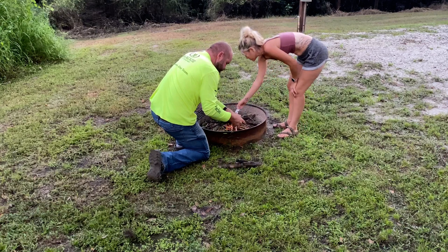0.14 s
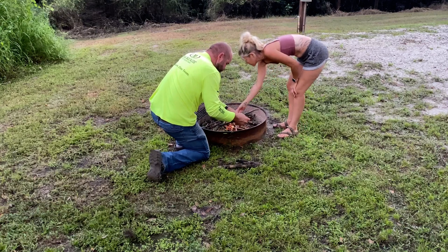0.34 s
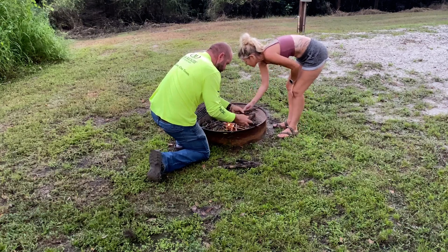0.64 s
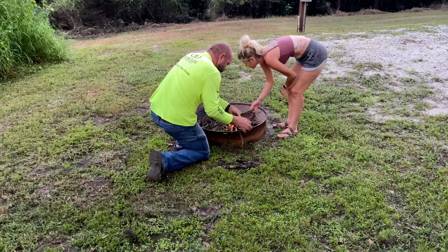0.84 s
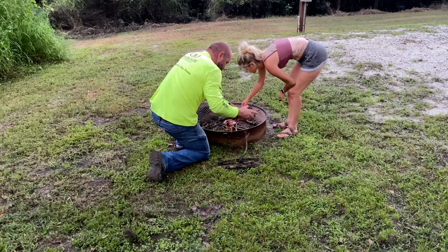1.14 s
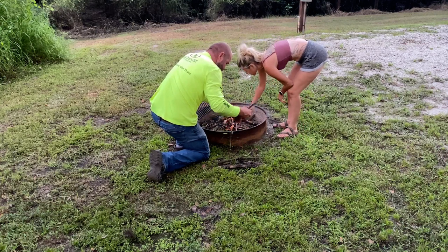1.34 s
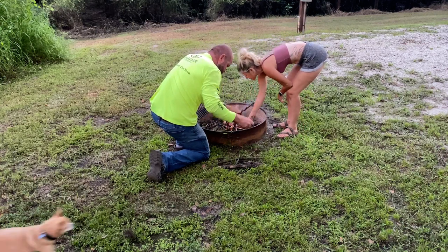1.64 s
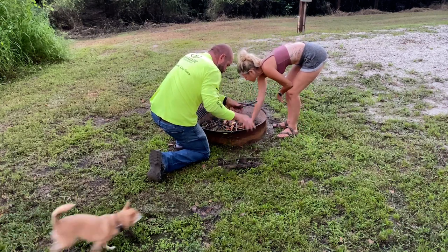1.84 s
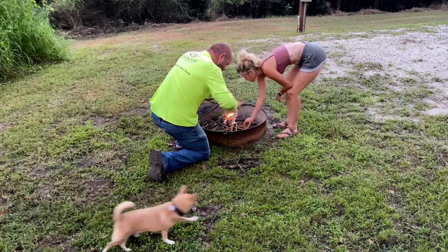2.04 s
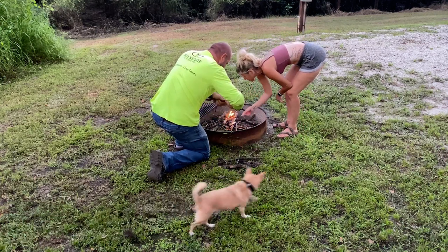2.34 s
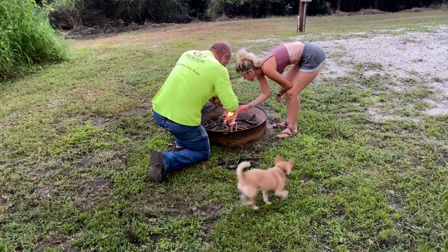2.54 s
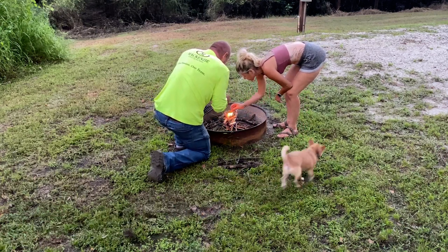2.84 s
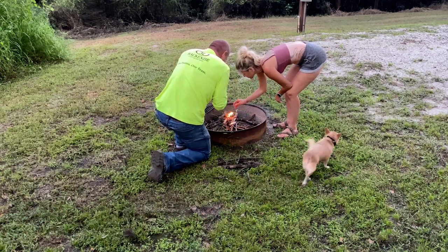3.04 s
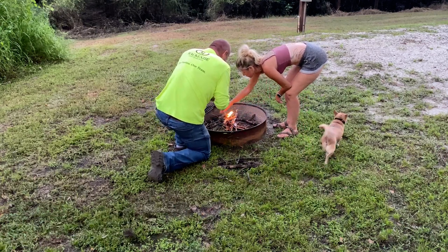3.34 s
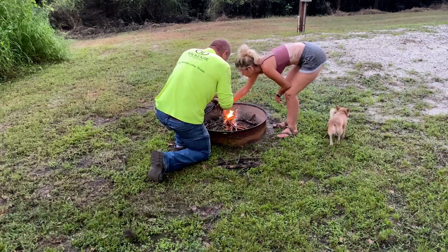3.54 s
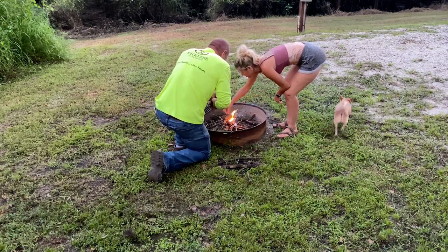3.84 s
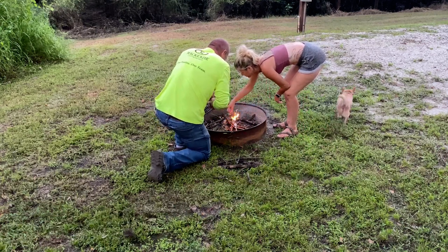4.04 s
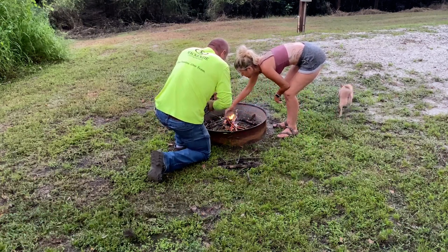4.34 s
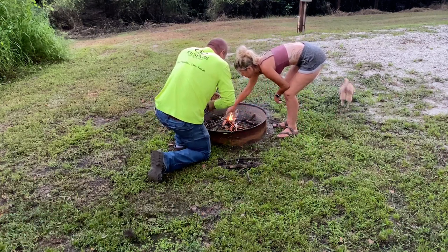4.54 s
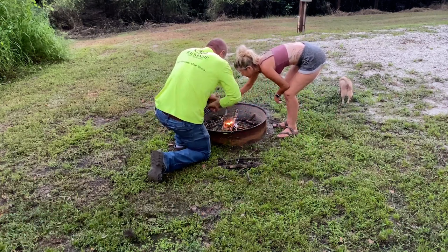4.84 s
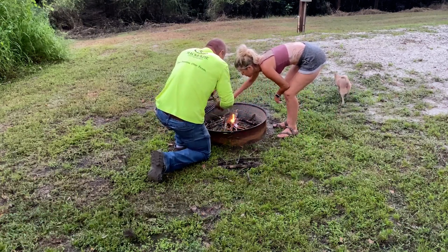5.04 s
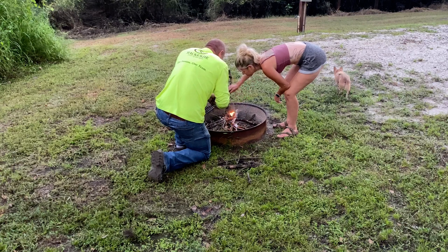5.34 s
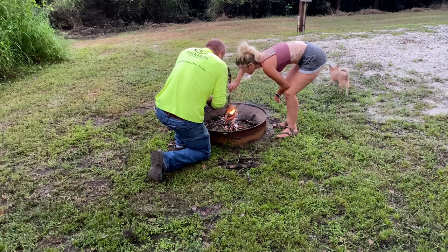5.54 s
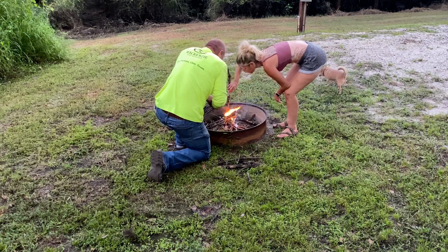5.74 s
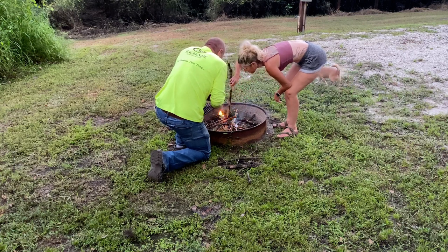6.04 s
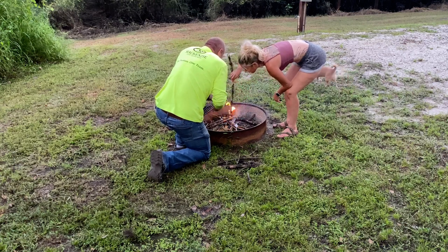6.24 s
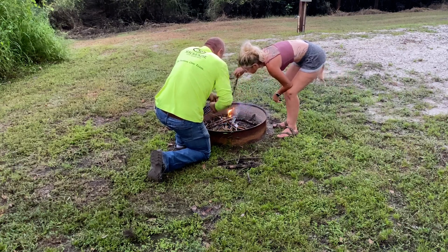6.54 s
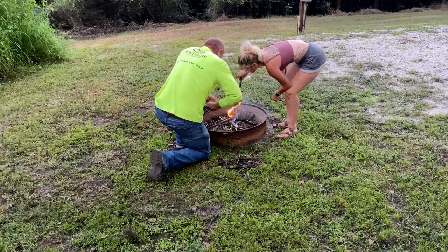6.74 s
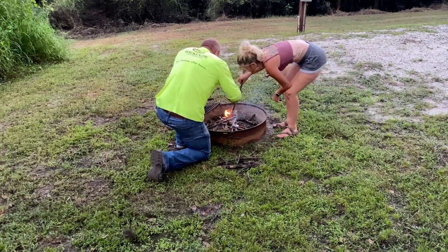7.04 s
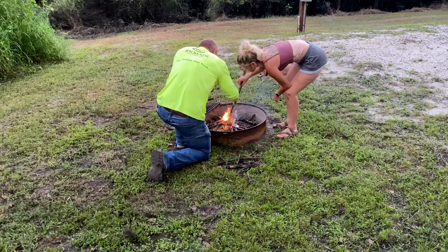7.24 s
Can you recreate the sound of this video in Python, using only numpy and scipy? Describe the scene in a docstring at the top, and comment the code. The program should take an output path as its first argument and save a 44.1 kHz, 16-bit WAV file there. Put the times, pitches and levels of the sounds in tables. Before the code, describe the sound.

A shrill, dense insect chorus buzzes over a low distant rumble while sticks knock, tick and crack sharply in a small fire nearby.

```python
"""Evening at a campsite: a dense insect chorus sings from the trees all round, over a low far-off rumble.
A few metres from the stereo microphone a small fire is fed in a steel ring: sticks crack, knock and tick.
The chorus is coloured noise with rasping voices, trills and two clicking cicadas; the rumble is low noise.
Wood sounds are snaps and dying runs of clicks that ring resonances. Each comes back off the ground and
the ring and dies away among the trees."""
import sys
import numpy as np
from scipy import signal
from scipy.fft import rfft, irfft, next_fast_len
from scipy.io import wavfile

SR = 44100
rng = np.random.default_rng(int(sys.argv[2]) if len(sys.argv) > 2 else 0)


def wrap_up_sound(samples):
    """Save the sound to the file named by the first command line argument, as 16-bit audio."""
    columns = np.atleast_2d(samples).T
    # keep every value between -1 and 1, then stretch to whole-number steps
    tamed = np.clip(columns, -1, 1)
    steps = np.round(tamed * 32767).astype(np.int16)
    wavfile.write(sys.argv[1], SR, steps)


N = 325281
TIME = np.arange(N) / SR
BINS_HZ = np.maximum(np.fft.rfftfreq(next_fast_len(N), 1 / SR), 1)


def from_db(db):
    """Decibels to gain."""
    return 10 ** (np.asarray(db) / 20)


def rms_one(x):
    """Scale to unit power."""
    return x / np.sqrt(np.mean(x ** 2) + 1e-20)


def in_time(rows):
    """Curve rows to one value a sample for each column after the time."""
    s, *columns = np.transpose(rows)
    return [np.interp(TIME, s, column) for column in columns]


def drift(rate):
    """Slow chance: noise smoothed to about the given rate in Hz, of spread 1."""
    step = 40  # samples between slow values
    r = np.exp(-2 * np.pi * rate * step / SR)
    noise = rng.standard_normal(N // step + 2002)
    slow = signal.lfilter([1], [1, -2 * r, r * r], noise)[2000:]  # skip the filter's start
    return np.interp(np.arange(N) / step, np.arange(len(slow)), rms_one(slow))


def resonance(x, hz, width_hz):
    """Two-pole band-pass with gain 1 on top: a body that rings at one pitch."""
    r = np.exp(-np.pi * width_hz / SR)
    feed = np.array([1, 0, -1]) * (1 - r * r) / 2
    return signal.lfilter(feed, [1, -2 * r * np.cos(2 * np.pi * hz / SR), r * r], x + 1e-18)


def pair(mid, side, alike):
    """Two unrelated signals make a left and a right of the given likeness."""
    alike = np.clip(alike, -1, 1)
    common = np.sqrt(1 + alike) * mid
    apart = np.sqrt(1 - alike) * side
    return np.array([common + apart, common - apart]) / np.sqrt(2)


def far_noise(spectrum, alike, lag_ms=0, pan_db=0):
    """Stereo noise of a given colour that reaches the left side late; rms 1."""
    hz, level_db = np.transpose(spectrum)
    size = next_fast_len(N)
    bins = pair(*rfft(rng.standard_normal((2, size))), alike)
    colour_db = np.interp(np.log(BINS_HZ), np.log(hz), level_db)
    # past the last point the colour falls 40 dB per octave
    colour_db = colour_db - 40 * np.maximum(np.log2(BINS_HZ / hz[-1]), 0)
    bins = bins * from_db(colour_db)
    bins[0] *= from_db(pan_db) * np.exp(-2j * np.pi * BINS_HZ * lag_ms / 1000)
    return rms_one(irfft(bins, size)[:, :N])


def burst(t60, alike):
    """Fibres give way in a quick run of snaps that dies by 60 dB in t60 seconds."""
    t = TIME[:SR // 8]
    snaps = pair(*rng.choice([-1., 1.], (2, len(t))), alike)
    return snaps * from_db(-60 * t / t60)


def add(out, s, sound):
    """Mix a short sound in at time s."""
    start = max(round(s * SR), 0)
    out[:, start:start + sound.shape[1]] += sound[:, :N - start]


def coloured(x, points_hz, points_db):
    """Pass a short sound through a body with the given colour; minimum phase, so nothing sounds early."""
    size = 8192
    hz = np.maximum(np.fft.rfftfreq(size, 1 / SR), 1)
    colour_db = np.interp(np.log(hz), np.log(points_hz), points_db)
    cepstrum = irfft(np.log(from_db(colour_db)))
    # folding the cepstrum forward in time gives the minimum phase
    cepstrum[1:size // 2] *= 2
    cepstrum[size // 2 + 1:] = 0
    return irfft(rfft(x, size) * np.exp(rfft(cepstrum)))


# colour of the open air and of high insect voices: pitch_hz, level_db (per Hz)
AIR_COLOUR = [(300, -1), (700, -9.5), (1500, -12.5), (2050, 2.5), (6800, 4), (7500, 11), (8100, 2.5),
              (9600, 5.5), (10800, 1.5), (12200, 3), (13200, -1.5), (15700, -3.5)]


def air():
    """Faint hiss all round the microphone: steady coloured noise."""
    return from_db(-56.0) * far_noise(AIR_COLOUR, alike=0.69, lag_ms=0.2666)


# colours of the deep drone and of the hum above it: pitch_hz, level_db (per Hz)
RUMBLE_COLOUR = [(22, -37), (35, -21), (46, -24), (55, -2.5), (63, -20), (80, 1), (105, -2), (128, -1.5),
                 (160, -11), (200, -19), (280, -36.5)]
UPPER_RUMBLE_COLOUR = [(40, -34), (130, -7), (200, -6.5), (245, 1.5), (320, -9), (420, -17), (600, -27),
                       (1000, -26)]
# how loud each arrives, the upper one coming and going: start_s, level_db
RUMBLE_LEVEL = [(0, -41.5), (.7, -43), (1.05, -44.5), (3.0, -43), (3.55, -44), (3.87, -42), (4.1, -44.5),
                (4.55, -43.5), (4.88, -46.5), (5.15, -43), (5.4, -45.5), (6.1, -42.5), (7.05, -41.5),
                (7.38, -44.5)]
UPPER_RUMBLE_LEVEL = [(0, -50.5), (.65, -61), (1.6, -54.5), (4.2, -61.5), (5.3, -58.5), (6.15, -62.5),
                      (7.38, -57.5)]


def rumble():
    """A low far-off drone: two bands of noise that rise and fall, almost the same on both sides."""
    low_db, = in_time(RUMBLE_LEVEL)
    upper_db, = in_time(UPPER_RUMBLE_LEVEL)
    low = far_noise(RUMBLE_COLOUR, alike=0.99, lag_ms=0.68, pan_db=-0.5)
    upper = far_noise(UPPER_RUMBLE_COLOUR, alike=0.98, lag_ms=0.67, pan_db=-2.0)
    return from_db(low_db) * low + from_db(upper_db) * upper


# nearer insects in three groups: level_db (against the chorus at their pitch),
# pan_db (left minus right), lead_ms (of the left side), pitches_hz
PERCHES = [(-9.5, -3.5, -.09, [2655, 2775, 2908, 3094, 3259, 3410, 3575, 3692, 3840]),
           (-12.0, 1.0, -.06, [3020, 3175, 3675, 3785, 3910, 4238, 4317, 4565, 4748, 4997]),
           (-10.5, 6.0, .07, [4045, 4156, 4855, 4872, 5060])]
# nominal rasp bandwidth; spread of the wander in pitch and of the swell in level
RASP_WIDTH_HZ, WANDER_HZ, SWELL_DB = 16.0, 8.0, 2.3


def singers(chorus_db):
    """Each near insect rasps in a narrow band that wanders and swells, heard from its perch."""
    out = np.zeros((2, N))
    for level_db, pan_db, lead_ms, pitches in PERCHES:
        for hz in pitches:
            swell = rms_one(from_db(SWELL_DB * drift(.8)))
            rasp = (drift(RASP_WIDTH_HZ / 2) + 1j * drift(RASP_WIDTH_HZ / 2)) * swell
            voice = rasp * np.exp(2j * np.pi * np.cumsum(hz + WANDER_HZ * drift(1)) / SR)
            lead = np.exp(2j * np.pi * hz * lead_ms / 1000)
            sides = np.array([[from_db(pan_db / 2) * lead], [from_db(-pan_db / 2)]])
            own_db = level_db + np.interp(hz, *np.transpose(CHORUS_COLOUR))
            out += (from_db(own_db) * sides * voice).real
    return from_db(chorus_db) * out


# how often, mean length, and middle level against the chorus at their pitch
TRILLS_PER_S, TRILL_S, TRILL_DB = 40, .2, -6.5


def trills(chorus_db):
    """Single insects stand out for a moment: brief tones, each at its own pitch, gliding a little."""
    out = np.zeros((2, N))
    for when, pitch, length, size, glide, place in rng.random((int(TRILLS_PER_S * N / SR), 6)):
        hz = 2900 + 2500 * pitch
        t = TIME[:int(TRILL_S * (.5 + length) * SR)]
        phase = 2 * np.pi * np.cumsum(hz + 200 * (glide - .5) * t) / SR
        lag = 2 * np.pi * hz * .0004 * place  # the left side hears it up to 0.4 ms late
        level_db = TRILL_DB + np.interp(hz, *np.transpose(CHORUS_COLOUR)) + 6 * (size - .5)
        tone = np.sin([phase - lag, phase])
        add(out, when * N / SR, from_db(level_db) * np.hanning(len(t)) * tone)
    return from_db(chorus_db) * out


# the leading cicada winds up: start_s, clicks_per_s, level_db
CICADA_WINDUP = [(0, 185, -45.5), (2.5, 196, -43.5), (4.2, 204, -42), (5.6, 210, -39.3), (7.38, 211, -39.3)]
# each cicada: faster_hz (clicks per s above the leader), level_db (against it), pan_db (left minus right)
CICADA_VOICES = [(0, 0, 11), (12, -5, 5)]
# resonances of a cicada's body: pitch_hz, width_hz, level_db
CICADA_BODY = [(3830, 520, 0), (5050, 520, -3)]
# below this pitch the cicadas' sound is cut away; the sound reaches the left side first
CICADA_LOW_HZ, CICADA_LEAD_S = 3000, .00009
# unsteadiness of the click rate, and of each click as a share of its period
CICADA_WANDER_HZ, CICADA_JITTER = 1.5, .012


def cicadas():
    """Two cicadas on the left: drums click faster and louder, each click ringing the body at two pitches."""
    rate_hz, level_db = in_time(CICADA_WINDUP)
    thin = signal.butter(6, CICADA_LOW_HZ, "high", fs=SR, output="sos")
    out = np.zeros((2, N))
    for faster_hz, own_db, pan_db in CICADA_VOICES:
        click_rate = rate_hz + faster_hz + CICADA_WANDER_HZ * drift(2)
        turns = np.cumsum(click_rate) / SR + CICADA_JITTER * drift(150)
        # one click each time the count of turns passes a whole number
        clicks = np.diff(np.floor(turns), prepend=0) * from_db(1.5 * rng.standard_normal(N))
        buzz = sum(from_db(db) * resonance(resonance(clicks, hz, width), hz, 2 * width)
                   for hz, width, db in CICADA_BODY)
        buzz = rms_one(signal.sosfilt(thin, buzz))
        right = from_db(-pan_db) * np.roll(buzz, round(CICADA_LEAD_S * SR))
        out += from_db(level_db + own_db) * np.array([buzz, right])
    return out


# colour of the massed far insects: pitch_hz, level_db (per Hz)
CHORUS_COLOUR = [(1900, -44.5), (2150, -42), (2300, -25), (2600, -15.5), (3000, -10.5), (3450, -4),
                 (3750, -2), (4100, -2.5), (4380, -6.5), (4750, -2.5), (5300, -8), (5650, -14.5),
                 (6150, -14), (6800, -22), (9000, -69)]
# the chorus swells slowly as the evening goes on
CHORUS_DB, CHORUS_SWELL_DB_PER_S = -37.5, 0.16


def insects():
    """Far voices merge into a shrill band of noise; nearer singers, trills and cicadas stand out of it."""
    chorus_db = CHORUS_DB + CHORUS_SWELL_DB_PER_S * TIME
    # louder on the right at the bottom, on the left near 3.9 kHz, on the right again at the top
    pan_db = np.interp(BINS_HZ, [2850, 3880, 5500, 5870], [-2.0, 1.0, -0.4, -1.0])
    mass = from_db(chorus_db) * far_noise(CHORUS_COLOUR, alike=0.0088, lag_ms=0.26, pan_db=pan_db)
    return mass + singers(chorus_db) + trills(chorus_db) + cicadas()


# kindling around each knock: level against the knock, spread in time, resting level, ceiling
RUSTLE_DB, RUSTLE_SPREAD_S, RUSTLE_REST_DB, RUSTLE_TOP_DB = -41, 0.27, -94, -79.5


def handling():
    """How busy the hands are among the kindling, as a gain: it rises and falls around the knocks."""
    power = from_db(RUSTLE_REST_DB) ** 2
    for s, level_db, *_ in KNOCKS:
        nearness = np.exp(-((TIME - s) / RUSTLE_SPREAD_S) ** 2)
        power = power + from_db(level_db + RUSTLE_DB) ** 2 * nearness
    return np.minimum(np.sqrt(power), from_db(RUSTLE_TOP_DB))


def rustle(per_s, spread_db):
    """Kindling shifts under the hands: faint uneven taps in clumps, ringing at eight pitches."""
    out = np.zeros((2, N))
    pitches = np.geomspace(550, 2200, num=8)
    busy = per_s / len(pitches) * from_db(6.3 * drift(8.1)) / SR  # chance of a tap in each sample
    for hz in pitches:
        sizes = from_db(spread_db * np.minimum(rng.exponential(1, N), 3))
        taps = (rng.random(N) < busy) * sizes
        out += resonance(resonance(taps, hz, hz / 5), hz, hz / 2)
    return handling() * rms_one(out)


# soft thumps on the ground by the fire, the one at 4.659 s the deep body of a crack: start_s, level_db,
# pitch_hz
THUMPS = [(0.031, -32, 372), (1.501, -38, 372), (3.498, -31, 358), (4.659, -36, 340), (5.37, -48, 350)]
THUMP_T60_S, THUMP_WIDTH_HZ = 0.073, 99


def thumps():
    """Something soft lands on the grass, or a cracking stick thuds deep: a short dull bump, noise through a low
    resonance."""
    out = np.zeros((2, N))
    for s, level_db, hz in THUMPS:
        push = resonance(burst(THUMP_T60_S, alike=0.69), hz, THUMP_WIDTH_HZ)
        add(out, s, from_db(level_db) * resonance(push, hz, THUMP_WIDTH_HZ))
    return out


# tiny ticks in the flames: start_s, level_db (before the bass is cut)
TICKS = [(.017, -39.5), (.032, -46), (0.278, -45), (.881, -41), (1.1734, -37.5), (1.2216, -43),
         (1.5259, -40), (2.032, -38.5), (2.093, -37.5), (2.176, -37.5), (2.399, -32), (2.503, -34),
         (4.571, -35), (6.458, -38), (6.554, -41), (6.6147, -38), (6.66, -38), (6.767, -43), (6.52, -43),
         (6.575, -42), (7.18, -41)]


def ticks():
    """Thin twigs tick in the flames: quick runs of snaps, all treble."""
    out = np.zeros((2, N))
    for s, level_db in TICKS:
        add(out, s, from_db(level_db) * burst(0.024, alike=0.18))
    return signal.sosfilt(signal.butter(2, 7500, "high", fs=SR, output="sos"), out)


# sticks that knock together as they are laid on: start_s, level_db, pitch_hz, width_hz (of the ring)
KNOCKS = [(0.017, -38, 1360, 600), (0.018, -31, 620, 400), (0.030, -24, 513, 250), (0.032, -39, 950, 500),
          (.277, -43, 1900, 500), (0.541, -37.5, 1880, 500), (0.566, -28, 1840, 250),
          (0.735, -42, 1100, 500), (0.751, -37, 1910, 600), (0.753, -40, 1000, 400),
          (0.921, -35.5, 1180, 500), (1.225, -37, 1770, 300), (1.39, -42.5, 990, 400),
          (1.475, -46, 980, 400), (1.497, -42, 900, 400), (1.517, -30.5, 2120, 600), (1.522, -32, 790, 250),
          (1.763, -35.5, 1850, 600), (1.767, -45, 1000, 500), (1.883, -44.5, 1070, 500),
          (2.176, -41, 1690, 500), (2.786, -34.5, 1850, 300), (3.508, -35, 1900, 400),
          (3.905, -41.5, 1860, 400), (5.148, -43, 940, 500), (5.15, -45, 2000, 500), (5.4, -50, 1390, 400),
          (6.471, -19.5, 2570, 150), (6.472, -48, 850, 400), (6.473, -41, 1600, 500),
          (6.485, -35, 2350, 400), (6.518, -46, 950, 400), (6.557, -40, 1750, 600), (6.614, -40, 1700, 600),
          (6.648, -41, 1500, 600), (6.660, -29, 1780, 600), (6.878, -52, 1120, 400),
          (7.172, -48, 1480, 500), (7.184, -47, 1050, 400)]
# first hard contact, and how fast the scraping that follows it dies
KNOCK_TAP_DB, SCRAPE_T60_S = 19, .04


def knocks():
    """Stick on stick: a tap and a scrape ring one main pitch, dull or pinging, and a hollow second tone."""
    out = np.zeros((2, N))
    for s, level_db, hz, width_hz in KNOCKS:
        touch = .7 * burst(SCRAPE_T60_S, alike=0.2)
        touch[:, 0] += from_db(KNOCK_TAP_DB)
        main = resonance(resonance(touch, hz, width_hz), hz, 1240)
        hollow = resonance(resonance(touch, 890, 500), 1360, 530)
        thin = signal.butter(3, min(0.21 * hz, 750), "high", fs=SR, output="sos")
        add(out, s, from_db(level_db) * signal.sosfilt(thin, main + from_db(-9.0) * hollow))
    return out


# splinters in one crack if it lasted its whole t60, and their spread in size
SPLINTERS, SPLINTER_SPREAD_DB = 150, 4


def splinters(t60):
    """Fibres part one by one: a dying run of clicks of very uneven size."""
    t = TIME[:SR // 8]
    sizes = from_db(SPLINTER_SPREAD_DB * np.minimum(rng.exponential(1, len(t)), 3))
    signed = sizes * rng.choice([-1, 1], len(t))
    clicks = signed * (rng.random(len(t)) < SPLINTERS / t60 / SR)
    return rms_one(clicks) * from_db(-60 * t / t60)


# sticks that crack: start_s, level_db, splintering_s, tilt_db (treble, per octave),
# body_db (hollow, below 2 kHz), low_ring_hz, high_ring_hz, bounce_ms (delay of the snap's bounce)
CRACKS = [(2.5256, -11.5, 0.02, 0.5, 1, 2160, 4620, 1.35), (3.6294, -18.5, 0.021, 3.5, 10, 1020, 3870, 1),
          (3.671, -35, 0.02, 8, 12, 2000, 3950, 1.3), (3.6808, -33, 0.17, 5.5, 12, 2050, 3950, 1.3),
          (3.6842, -28.5, 0.04, 0.5, 7.5, 2050, 3950, 1.4), (3.699, -31.5, 0.018, 1, 9.5, 2050, 3950, 1.5),
          (4.6459, -7, 0.025, 2, 0.5, 2360, 4600, 1.49), (4.6603, -23, 0.06, 0.5, 7, 2200, 4800, 1.24),
          (4.6812, -18.5, 0.018, 2.5, 13.5, 1870, 4540, 1.2),
          (4.687, -36.5, 0.11, 0, 13.5, 2450, 3950, 1.2)]
# colour of splitting wood: pitch_hz, level_db (per Hz)
WOOD = [(300, -27), (750, -22), (1020, -13), (1300, -13.5), (1620, -11), (2300, -9), (2950, -4),
        (3800, -1.5), (4900, 1.5), (6300, .5), (7850, -6), (9200, -5.5), (11000, -2.5), (13000, -9),
        (15500, -9)]
# woody rings of the pile of sticks, set off by every crack: pitch_hz, width_hz, level_db
PILE = [(980, 110, -7), (1190, 110, -3), (1700, 110, -7), (2170, 110, -2), (2550, 110, -1), (2980, 150, -3)]
# first snap over the splinters, and its first bounce off the floor of the steel ring against it
SNAP_DB, BOUNCE_DB = 19, -3.5
# how each stick rings, against the split, at its lower and its upper pitch
LOW_RING_DB, LOW_RING_WIDTH_HZ, HIGH_RING_DB, HIGH_RING_WIDTH_HZ = 0, 130, -1, 400


def cracks():
    """A stick splits: a snap, its bounce, then splintering; the stick and the pile ring."""
    out = np.zeros((2, N))
    hz, wood_db = np.transpose(WOOD)
    hollow = np.interp(hz, [2000, 3200], [1, 0])
    snap = signal.unit_impulse(SR // 8)
    # a chain of all-pass steps lets the snap's highs run ahead of its lows
    for _ in range(24):
        snap = signal.lfilter([-.5, 1], [1, -.5], snap)
    for s, level_db, t60, tilt_db, body_db, low_hz, high_hz, bounce_ms in CRACKS:
        bounce = from_db(BOUNCE_DB) * np.roll(snap, round(bounce_ms * SR / 1000))
        splintering = pair(splinters(t60), splinters(t60), alike=.3)
        split = from_db(SNAP_DB) * (snap + bounce) + splintering
        rings = from_db(LOW_RING_DB) * resonance(split, low_hz, LOW_RING_WIDTH_HZ)
        rings += from_db(HIGH_RING_DB) * resonance(split, high_hz, HIGH_RING_WIDTH_HZ)
        for ring_hz, width_hz, db in PILE:
            rings += from_db(db) * resonance(split, ring_hz, width_hz)
        colour_db = level_db + wood_db + tilt_db * np.log2(hz / 5000) + body_db * hollow
        add(out, s, coloured((split + rings) / 2, hz, colour_db))
    return out


# reflections off the steel ring and the grass: delay_s, level_db
ECHOES = [(.0022, -15), (.0062, -13), (.0118, -11)]
TREES_DB, TREES_T60_S = -12.5, .33


def clearing(x):
    """A few near reflections, each roughened by its surface, then a thin scatter from the trees."""
    t = TIME[:SR // 2]
    response = rng.standard_normal((2, len(t))) * from_db(-60 * t / TREES_T60_S) * (t > .004)
    response *= from_db(TREES_DB) / np.sqrt(np.sum(response ** 2) / 2)
    for delay, db in ECHOES:
        # the longer the path, the more the echo is smeared
        rough = burst(delay / 2, alike=0.76)
        add(response, delay, from_db(db) * rough / np.sqrt(np.sum(rough ** 2) / 2))
    return x + signal.fftconvolve(x, response, axes=1)[:, :N]


def scene():
    """The fire in front, insects and rumble all round."""
    background = air() + rumble() + insects()
    fire = rustle(per_s=90.0, spread_db=0.5) + thumps() + ticks() + knocks() + cracks()
    return background + clearing(fire)


# level that peaks never pass when rounded, as a share of full scale; where the treble is cut
HEADROOM, CUTOFF_HZ = .5, 15750


def record(dry):
    """At the microphone the sharpest peaks are rounded and the top is cut steeply."""
    rounded = dry / (1 + (dry / HEADROOM) ** 4) ** (1 / 4)
    steep = signal.ellip(10, .1, 80, CUTOFF_HZ, fs=SR, output="sos")
    return signal.sosfilt(steep, rounded)


dry = scene()
out = record(dry)
wrap_up_sound(out)
```